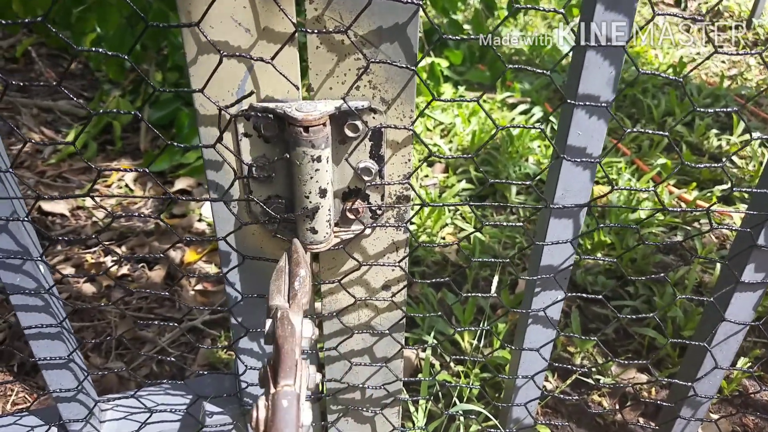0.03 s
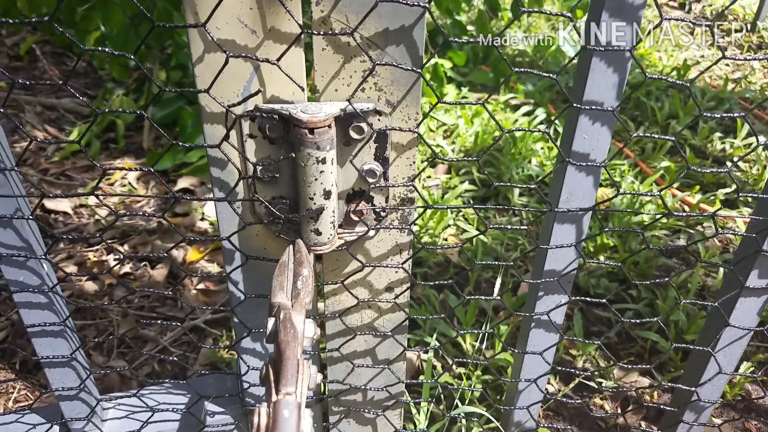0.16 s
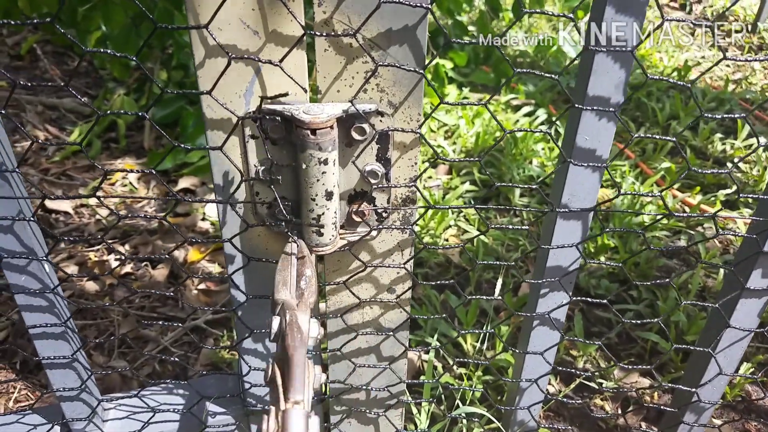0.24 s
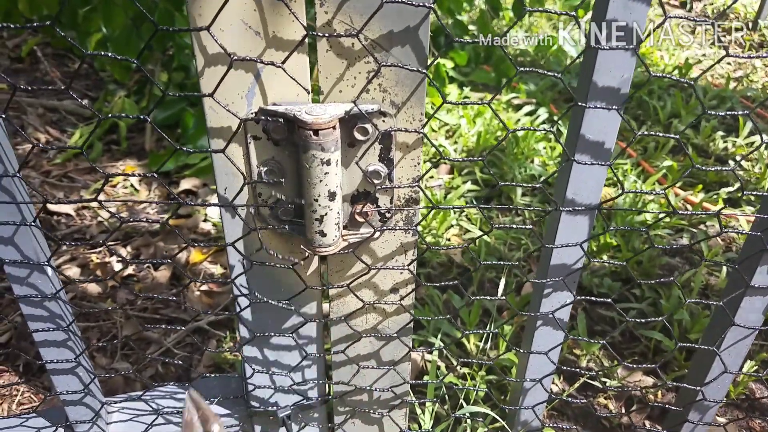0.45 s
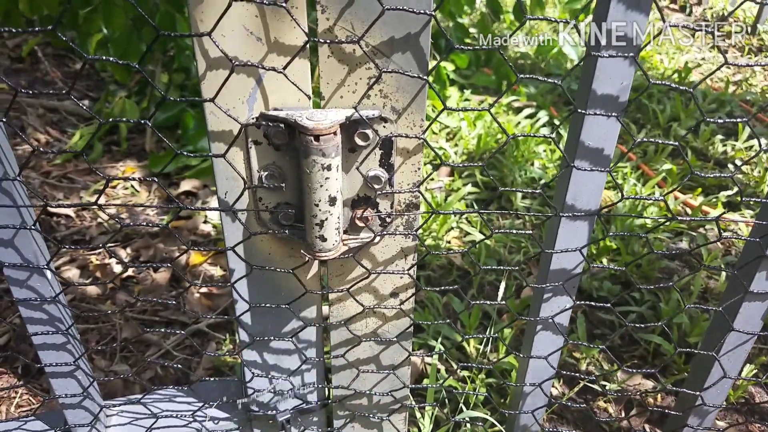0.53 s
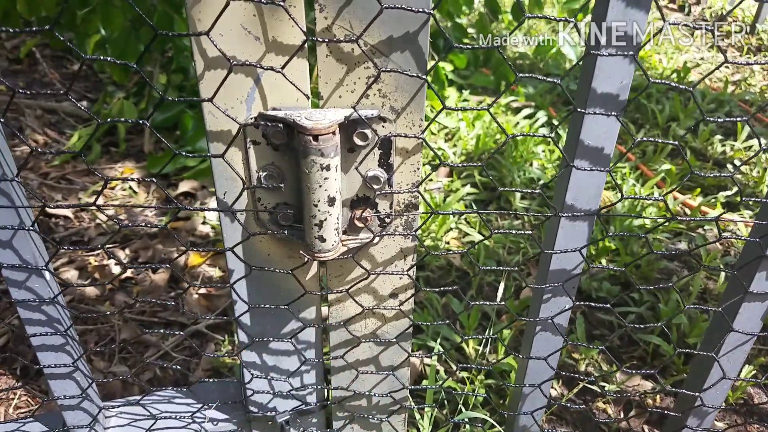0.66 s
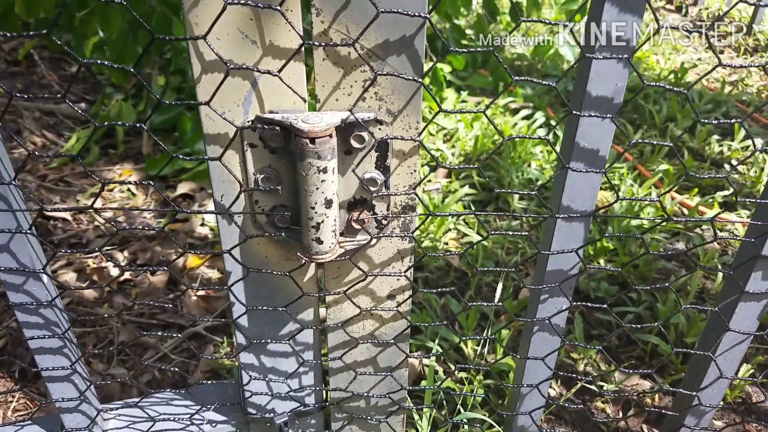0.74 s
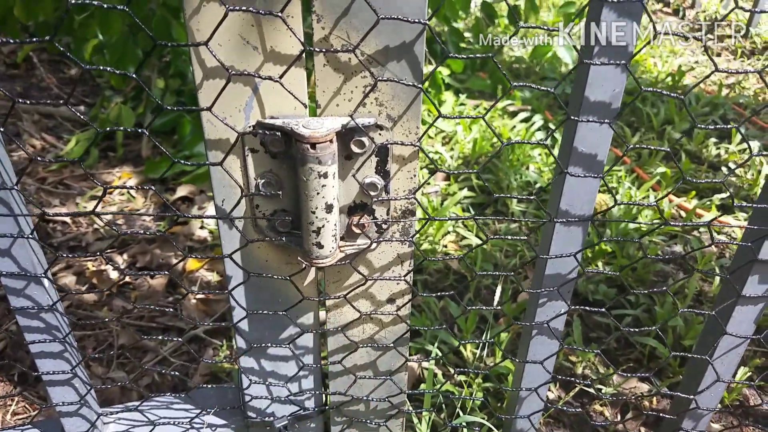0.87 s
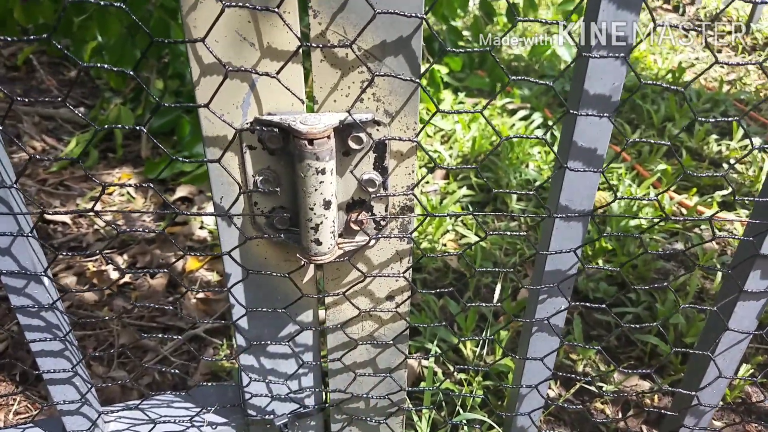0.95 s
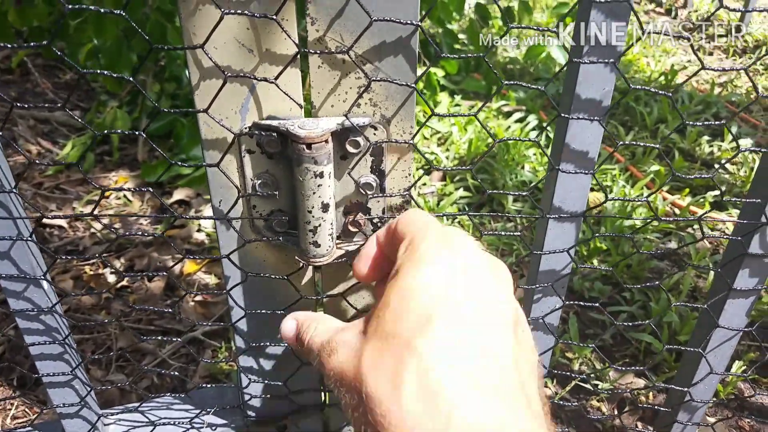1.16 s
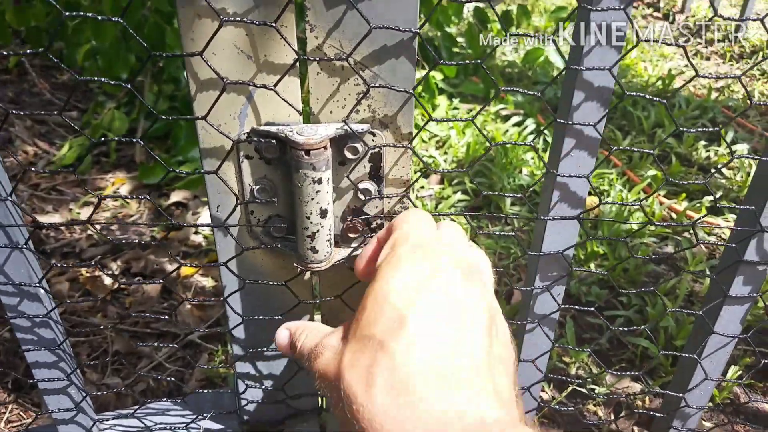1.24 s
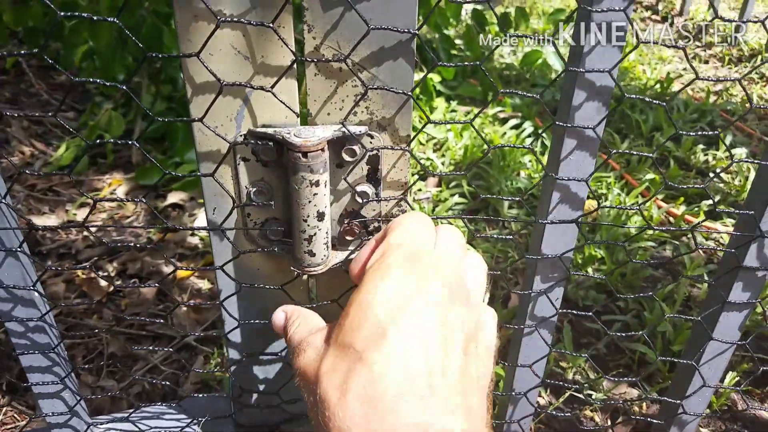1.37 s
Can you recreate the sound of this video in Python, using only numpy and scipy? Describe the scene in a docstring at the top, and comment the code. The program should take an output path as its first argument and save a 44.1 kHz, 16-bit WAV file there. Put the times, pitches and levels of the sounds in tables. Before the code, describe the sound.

Pliers snap through wire mesh at about 0.2 seconds, just after two faint ticks. The loud, close metallic crack runs into a short rattle and ring against a wooden post, gone by 0.5 seconds. Faint wire scrapes follow, then a light wooden knock and clink near 0.9 seconds and a tick at 1 second. Quiet outdoor air and a distant engine lie underneath, with a soft stir of air near 1.3 seconds.

```python
"""Two hard cracks, then a rattle that rings out: pliers snap through wire mesh on a wooden post outdoors.
The jaws ring dead; the freed strands ring on, chatter and slap the post, and the garden scatters it back.
Loose wire ticks and scrapes, the post is knocked once, and a reaching arm stirs the air.
A far engine drones in the open air. Gain control ducks after the snap and slowly recovers."""
import sys
import numpy as np
from scipy import signal
from scipy.fft import rfft, irfft
from scipy.io import wavfile
from scipy.ndimage import uniform_filter1d, minimum_filter1d

SR = 44100
rng = np.random.default_rng(int(sys.argv[2]) if len(sys.argv) > 2 else 0)


def materialize(psi):
    """Save the field psi as 16-bit PCM at rate SR to the path in sys.argv[1].

    A 1-D psi becomes a single channel; in a 2-D psi each row is a channel.
    """
    bounded = np.clip(np.atleast_2d(psi).T, -1, 1)
    quanta = np.round(bounded * 32767).astype(np.int16)
    wavfile.write(sys.argv[1], SR, quanta)


N = 61739
TIME = np.arange(N) / SR

# wire giving way: (time [s], level [dB], pitch [ratio], splinter hiss [dB])
CRACK_EVENTS = [(.2089, -.7, 1.02, -22), (.2149, 1, .985, -17)]
# metal-on-metal hiss: (frequency [Hz], relative density [dB])
METAL_SPECTRUM = [(200, -30), (1000, -7), (3000, 3), (5000, -0.5), (7000, -2), (9000, -5), (11800, 4.5),
                  (14000, -4.5), (16000, 1.5)]
SNAP_S, STRAND_ATTACK_S = CRACK_EVENTS[0][0], 0.006
AIR_PAN_DB, FAR_LEAD_S = 2, 0.00024  # far sounds: left louder and earlier


def from_db(db):
    """Decibels to gain."""
    return 10 ** (np.asarray(db) / 20)


def unit_rms(x):
    """Scale to unit power."""
    return x / np.sqrt(np.mean(x ** 2) + 1e-20)


def pan(db):
    """Stereo gains for a left-minus-right level."""
    return from_db(np.array([[db], [-db]]) / 2)


def at_hz(points, hz):
    """Read a table on a log-frequency axis."""
    table_hz, values = np.transpose(points)
    return np.interp(np.log(hz + 1), np.log(table_hz), values)


def since(start_s):
    """Seconds since the start, zero before."""
    return np.maximum(TIME - start_s, 0)


def envelope(start_s, attack_s, hold_s, t60_s):
    """Linear rise, hold, exponential fall."""
    rise = np.minimum(since(start_s) / attack_s, 1)
    return rise * from_db(-60 * since(start_s + attack_s + hold_s) / t60_s)


def coloured(spectrum, source=None, lead_s=0):
    """Shape two random signals into a stereo pair, coherent in the bass, left early by lead_s; rms 1."""
    # left-right likeness: (frequency [Hz], correlation [ratio])
    correlation = [(60, 0.97), (500, 0.96), (1000, 0.89), (2500, 0.1), (4500, 0.1), (12000, 0.12)]
    mid, side = rfft(rng.standard_normal((2, N)) if source is None else source)
    hz = np.linspace(0, SR / 2, len(mid))
    alike = at_hz(correlation, hz)
    pair = np.sqrt(1 + alike) * mid + np.sqrt(1 - alike) * side * [[1], [-1]]
    arrival = np.exp(2j * np.pi * hz * np.array([[lead_s], [0]]))
    return unit_rms(irfft(pair * arrival * from_db(at_hz(spectrum, hz)), N))


def strike(start_s, modes, left_lag_s=0.00007):
    """Heavily damped modes of alternating sign swell for a few cycles and die."""
    t = np.array([since(start_s + left_lag_s), since(start_s)])
    out = 0
    for k, (hz, width_hz, db, pan_db) in enumerate(modes):
        age = np.pi * width_hz * t
        swell = age ** 2 * np.exp(2 - 2 * age)
        out += (-1) ** k * from_db(db) * pan(pan_db) * swell * np.sin(2 * np.pi * hz * t)
    return out


def open_air():
    """Steady outdoor noise."""
    # ambience: (frequency [Hz], relative density [dB])
    spectrum = [(25, -11), (55, -15.5), (120, -5.5), (250, -3.5), (450, -0.5), (650, -1.5), (900, -2),
                (1200, -9.5), (1800, -10), (2700, -10.5), (3800, -20.5), (5200, -18), (7000, -26.5),
                (9000, -30), (12000, -23.5), (16000, -43)]
    return from_db(-44) * coloured(spectrum, lead_s=FAR_LEAD_S)


def engine(rate_hz=59.03, wander_ratio=0.0028):
    """Harmonics of a far engine at nearly steady speed."""
    # drone: (harmonic [number], rms level [dB])
    harmonics = [(4, -59), (5, -63), (6, -57.5), (7, -53.5), (8, -58), (10, -58.5), (13, -51.5),
                 (15, -53.5)]
    lowpass = signal.butter(2, 6, fs=SR, output="sos")
    wander = unit_rms(signal.sosfilt(lowpass, rng.standard_normal(2 * N))[N:])
    cycles = np.cumsum(rate_hz * (1 + wander_ratio * wander)) / SR
    cycles = cycles + rate_hz * np.array([[FAR_LEAD_S], [0]])
    return sum(from_db(db) * np.sqrt(2) * np.sin(2 * np.pi * (k * cycles + rng.random()))
               for k, db in harmonics)


def reaching_arm():
    """An arm stirs the air: low noise that swells near the end."""
    # swell: (time [s], level [dB])
    levels = [(0.95, -48), (1.18, -50.5), (1.33, -42.5), (1.4, -48)]
    # stirred air: (frequency [Hz], relative density [dB])
    spectrum = [(25, 0), (70, -1), (130, 4), (300, 4), (700, -31), (2500, -20), (7000, -40), (13000, -17.5)]
    return from_db(np.interp(TIME, *np.transpose(levels))) * coloured(spectrum)


def wire_scrapes(width_hz=400):
    """Wire slides briefly over wire: hiss and one resonance."""
    # slides: (time [s], nominal length [s], hiss [dB], resonance [Hz], ring [dB], left-right [dB])
    slides = [(0.287, 0.0055, -38, 2500, -46, -9), (0.2944, 0.0053, -33, 5000, -38, -0.5),
              (0.381, 0.056, -79, 2700, -46, 6.5), (0.487, 0.0046, -43, 5300, -53, -4),
              (0.62, 0.044, -44.5, 2560, -51, -1.5), (0.934, 0.022, -37.5, 2300, -43, 0),
              (1.246, 0.0035, -55, 4200, -55, 3)]
    hiss = coloured(METAL_SPECTRUM)
    radius = np.exp(-np.pi * width_hz / SR)
    out = 0
    for start_s, length_s, hiss_db, hz, ring_db, pan_db in slides:
        poles = [1, -2 * radius * np.cos(2 * np.pi * hz / SR), radius ** 2]
        ring = unit_rms(signal.lfilter([1, 0, -1], poles, rng.standard_normal((2, N))))
        shape = envelope(start_s, attack_s=0.28 * length_s, hold_s=0.19 * length_s, t60_s=3 * length_s)
        out += pan(pan_db) * shape * (from_db(hiss_db) * hiss + from_db(ring_db) * ring)
    return out


def strand_ticks():
    """A taut strand slips with dry grit and a short ring; two early ticks are dull, the late one bright."""
    # slips: (time [s], gain [dB], tilt [dB/octave], left-right [dB])
    slips = [(0.124, -7, -2, 8), (0.1504, -1, -6, 6), (1.0115, 1, 10, -4)]
    # taut strand: (frequency [Hz], width [Hz], level [dB])
    modes = [(3050, 190, -41.5), (4400, 260, -46), (4900, 240, -49), (5860, 260, -45.5)]
    # grit: (frequency [Hz], relative density [dB])
    spectrum = [(700, -10), (1600, 0), (5500, -2), (7500, -6), (10000, -18)]
    centre_hz = np.mean(np.array(modes)[:, 0])
    grit = from_db(-44) * coloured(spectrum)
    out = 0
    for start_s, gain_db, tilt_db, pan_db in slips:
        tilted = [(hz, width_hz, db + tilt_db * np.log2(hz / centre_hz), 0) for hz, width_hz, db in modes]
        burst = grit * envelope(start_s, attack_s=0.001, hold_s=0, t60_s=0.032)
        out += from_db(gain_db) * pan(pan_db) * (strike(start_s, tilted) + burst)
    return out


def strand_clink(start_s=0.9402):
    """A strand clinks as it slides."""
    # sliding strand: (frequency [Hz], width [Hz], level [dB], left-right [dB])
    modes = [(1490, 150, -31, 0), (2330, 120, -39, 2)]
    return strike(start_s, modes)


def post_knock(start_s=0.8819):
    """A dead wooden knock with a small tick on top."""
    # knocked wood: (frequency [Hz], width [Hz], level [dB], left-right [dB])
    modes = [(410, 160, -20, .5), (990, 235, -17.5, 0), (1390, 280, -22.5, 3), (1660, 130, -30, 4.5),
             (2200, 370, -31, 4), (4450, 170, -33, 6)]
    shape = envelope(start_s, attack_s=0.0018, hold_s=0.00059, t60_s=0.028)
    return strike(start_s, modes) + from_db(-30) * coloured(METAL_SPECTRUM) * shape


def garden_scatter():
    """The garden scatters the snap back as a noise tail."""
    # tail: (frequency [Hz], relative density [dB])
    spectrum = [(120, -25), (400, 5.5), (800, 2), (1400, -1), (2700, -0.5), (4500, -10.5), (8000, -22.5),
                (12000, -23), (16000, -35.5)]
    return from_db(-29) * coloured(spectrum) * envelope(0.2184, attack_s=0.021, hold_s=0, t60_s=0.33)


def strand_shimmer(count=48, low_hz=3800, high_hz=15500, spread_db=18):
    """The strands' high modes at random pitches, coloured like the metal hiss."""
    draws = rng.random((count, 4))
    mode_hz = low_hz + draws[:, 0] * (high_hz - low_hz)
    gains = from_db(at_hz(METAL_SPECTRUM, mode_hz) - spread_db * draws[:, 1])
    tones = sum(gain * np.sin(2 * np.pi * (hz * TIME + phase[:, None]))
                for hz, gain, phase in zip(mode_hz, gains, draws[:, 2:]))
    return from_db(-31) * unit_rms(tones) * envelope(SNAP_S, STRAND_ATTACK_S, hold_s=0.016, t60_s=0.13)


def strand_ring(gain_db=-0.7, pan_db=4):
    """Freed strands ring on after the snap."""
    # free strands: (frequency [Hz], relative level [dB], t60 [s])
    modes = [(1248, -35, .33), (1362, -35, .28), (1413, -32, .25), (1695, -31, .2), (1735, -35, .28),
             (1872, -36, .26), (2177, -30, .16), (2320, -32, .22), (2393, -28, .18), (2493, -24, .19),
             (2668, -23, .12), (2795, -31, .2), (3145, -31, .15), (3214, -32, .15), (3660, -37, .16)]
    out = 0
    for hz, db, t60_s in modes:
        cycles = hz * since(SNAP_S) + rng.random() + rng.normal(0, 0.034, (2, 1))
        out += from_db(db) * envelope(SNAP_S, STRAND_ATTACK_S, 0, t60_s) * np.sin(2 * np.pi * cycles)
    return from_db(gain_db) * pan(pan_db) * out


def mesh_rattle(contacts_per_s=5000):
    """The shaking mesh chatters in a dense burst of random contacts."""
    # chatter: (frequency [Hz], relative density [dB])
    spectrum = [(150, -31), (450, -4), (900, -0.5), (1800, 1), (2700, 3.5), (3600, -1), (5500, -3),
                (7000, -16), (9000, -16.5), (11800, -7), (15500, -14)]
    contacts = (rng.random(N) < contacts_per_s / SR) * rng.choice([-1, 1], (2, N))
    shape = envelope(0.2183, attack_s=0.012, hold_s=0.0087, t60_s=0.086)
    return from_db(-22) * coloured(spectrum, contacts) * shape


def post_slaps():
    """The mesh slaps the post, which rings hollow."""
    # slaps: (time [s], gain [dB])
    slaps = [(.2268, 0), (.2315, -1)]
    # post: (frequency [Hz], width [Hz], level [dB], left-right [dB])
    modes = [(240, 70, -44, 1), (450, 130, -34, 1), (620, 60, -40, 0), (790, 70, -21, 2),
             (960, 140, -31, 2)]
    return sum(from_db(db) * strike(start_s, modes) for start_s, db in slaps)


def pliers_snap(bounce_s=0.0043, bounce_db=-12):
    """Each crack jolts the jaws, which bounce once, and throws off a bright splinter of noise."""
    # jaws: (frequency [Hz], width [Hz], level [dB], left-right [dB])
    jaw_modes = [(800, 150, -27, 1), (1480, 600, -18, .5), (2510, 430, -4.6, 6.2), (3250, 380, -18, 3.5),
                 (4480, 550, -21.5, 6), (5750, 700, -24.5, 1.5)]
    out = 0
    for start_s, db, pitch, hiss_db in CRACK_EVENTS:
        modes = np.array(jaw_modes) * [pitch, 1, 1, 1]
        jolt = strike(start_s, modes) + from_db(bounce_db) * strike(start_s + bounce_s, modes)
        burst = envelope(start_s, attack_s=0.00043, hold_s=0.00044, t60_s=0.025)
        out += from_db(db) * jolt + from_db(hiss_db) * coloured(METAL_SPECTRUM) * burst
    return out


def scene():
    """Stereo sum at the microphone."""
    snap = pliers_snap() + post_slaps() + strand_ring() + strand_shimmer()
    aftermath = mesh_rattle() + garden_scatter()
    handling = post_knock() + strand_clink() + strand_ticks() + wire_scrapes()
    background = engine() + reaching_arm() + open_air()
    return snap + handling + pan(AIR_PAN_DB) * (aftermath + background)


def record(dry):
    """Gain control ducks on a loud peak, holds and recovers; peaks clip and the top is cut."""
    threshold_db, max_duck_db, cutoff_hz = -14, 10.5, 15650
    smoothing_s, hold_s, recovery_db_per_s = 0.18, 0.4, 27.5
    power = uniform_filter1d(np.mean(dry ** 2, axis=0), 88)  # 2 ms window
    level_db = 10 * np.log10(np.abs(power) + 1e-12)
    demand_db = np.clip(2 * (level_db - threshold_db), 0, max_duck_db)
    ramp_db = recovery_db_per_s * TIME
    fading_db = np.maximum.accumulate(demand_db + ramp_db) - ramp_db
    window = int(hold_s * SR) | 1
    held_db = -minimum_filter1d(-fading_db, window, origin=window // 2, mode="constant")  # trailing max
    pole = np.exp(-1 / (smoothing_s * SR))
    duck_db = signal.lfilter([1 - pole], [1, -pole], held_db)
    clipped = np.clip(dry * from_db(-duck_db), -1, 1)
    return signal.sosfilt(signal.ellip(10, 0.2, 80, cutoff_hz, fs=SR, output="sos"), clipped)


dry = scene()
out = record(dry)
materialize(out)
```